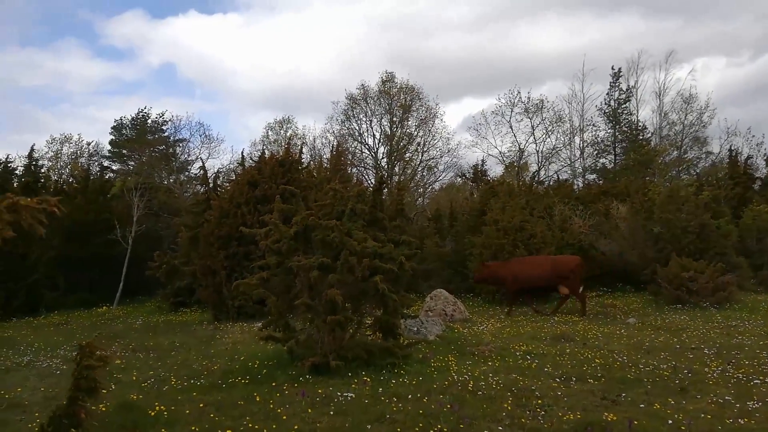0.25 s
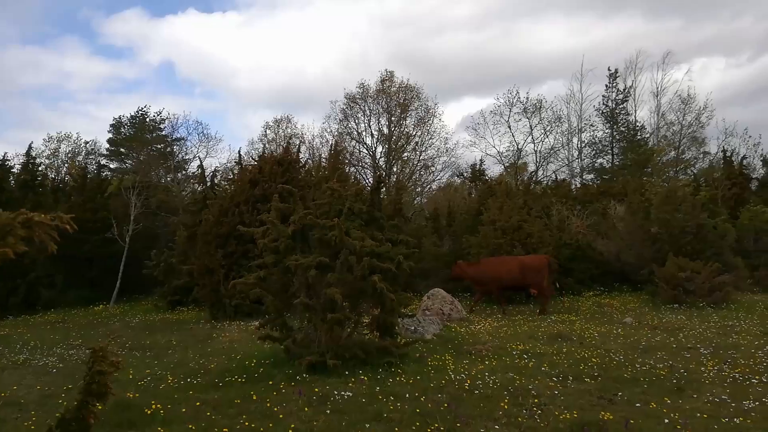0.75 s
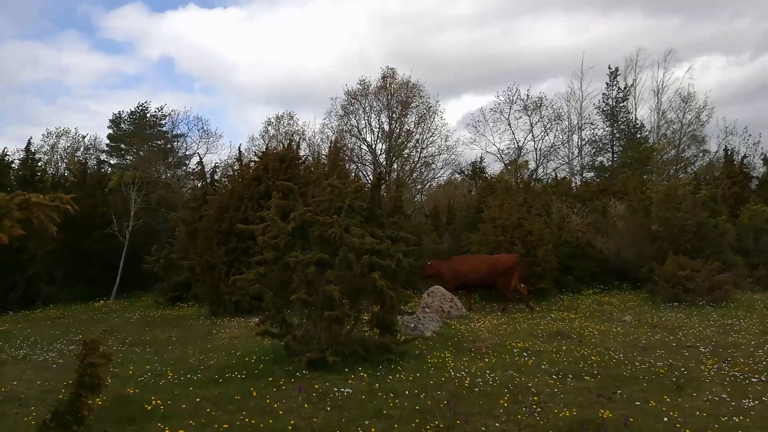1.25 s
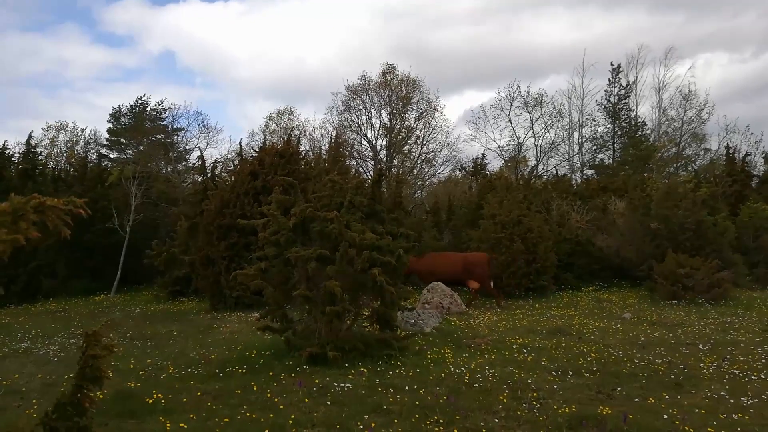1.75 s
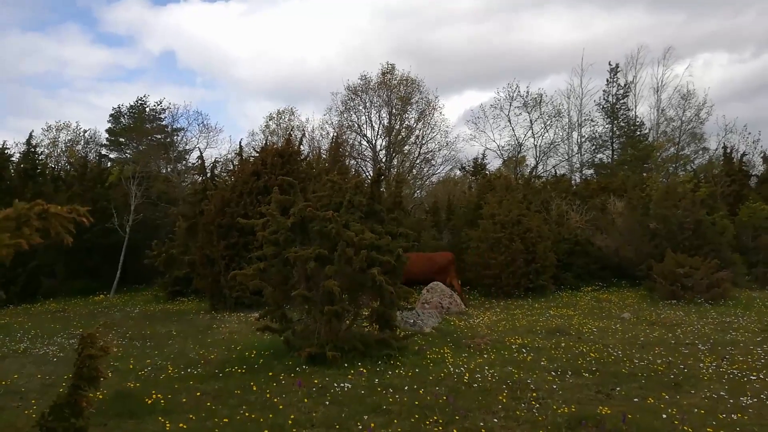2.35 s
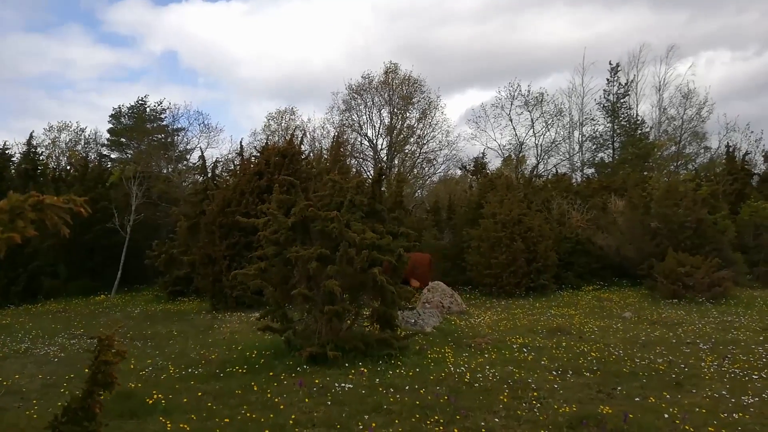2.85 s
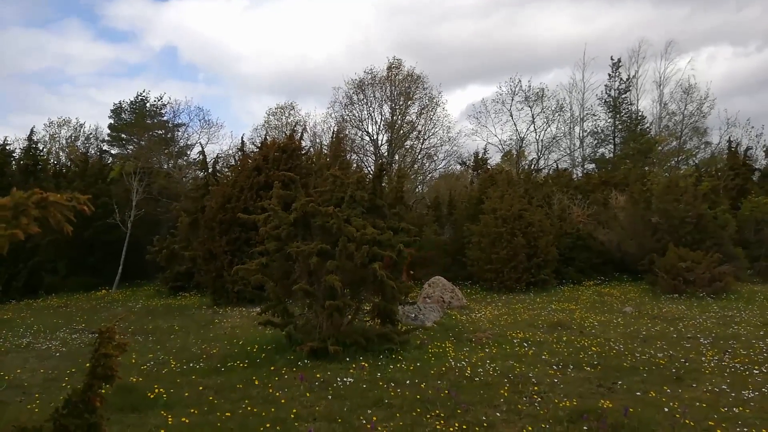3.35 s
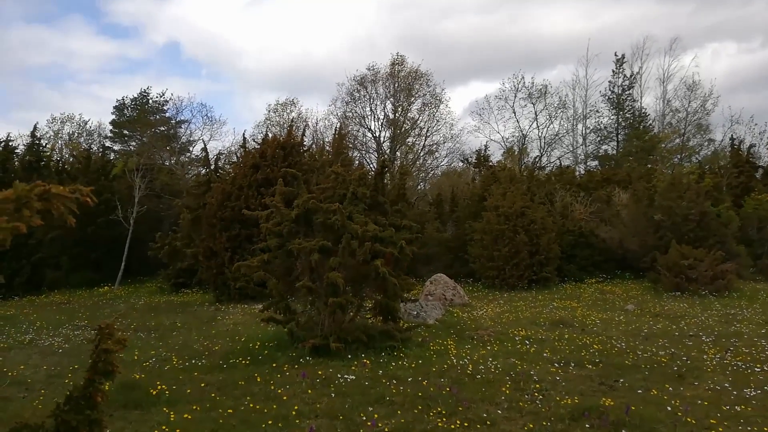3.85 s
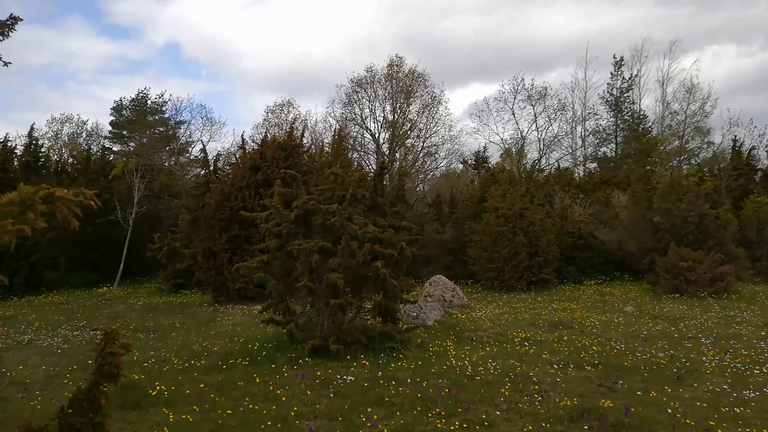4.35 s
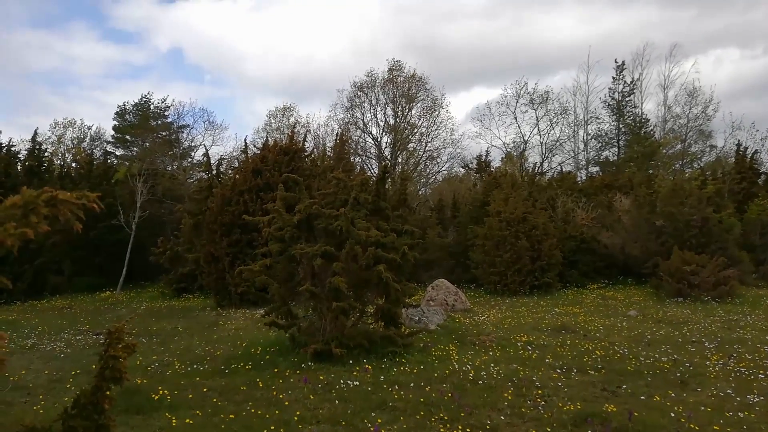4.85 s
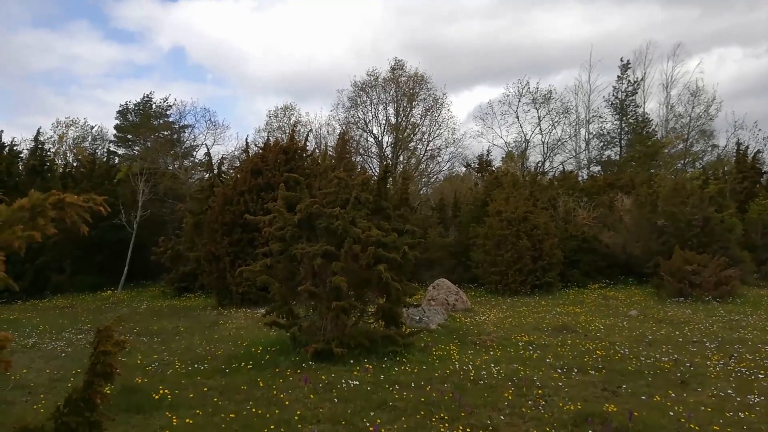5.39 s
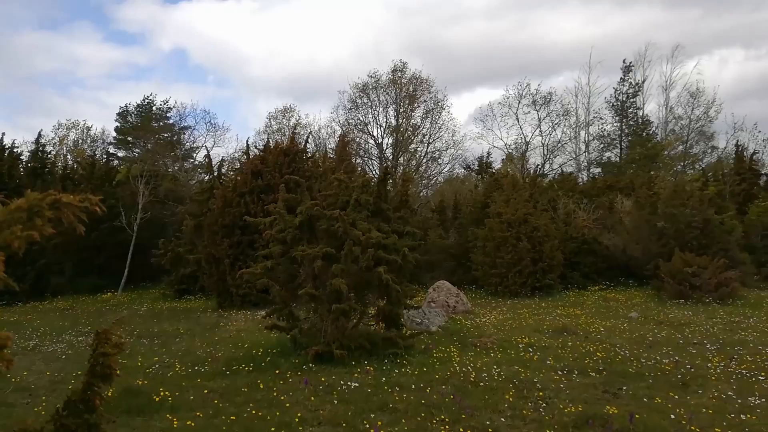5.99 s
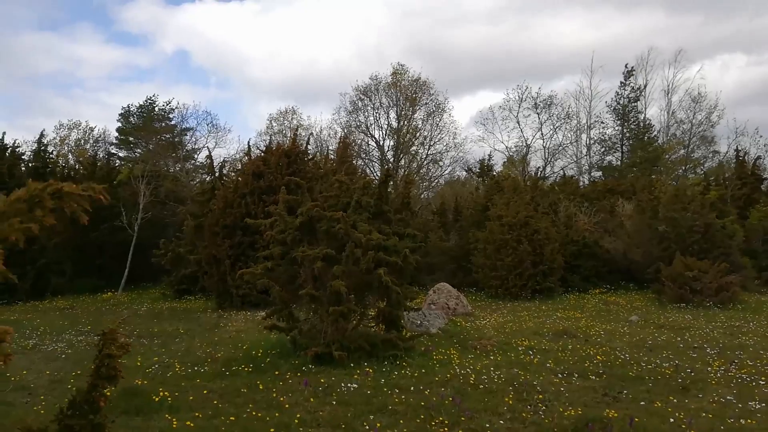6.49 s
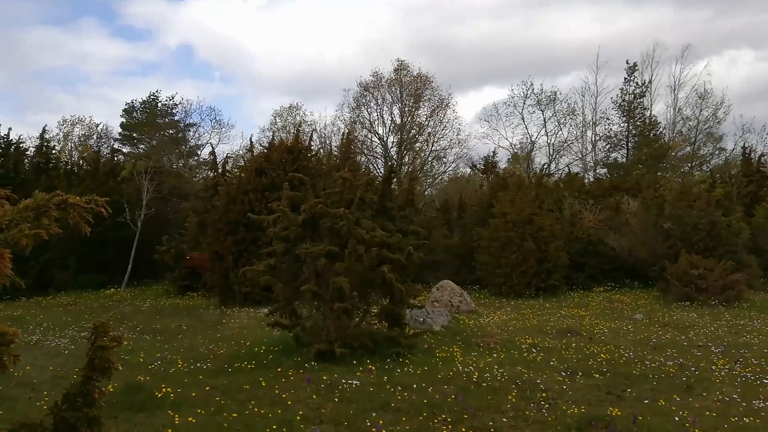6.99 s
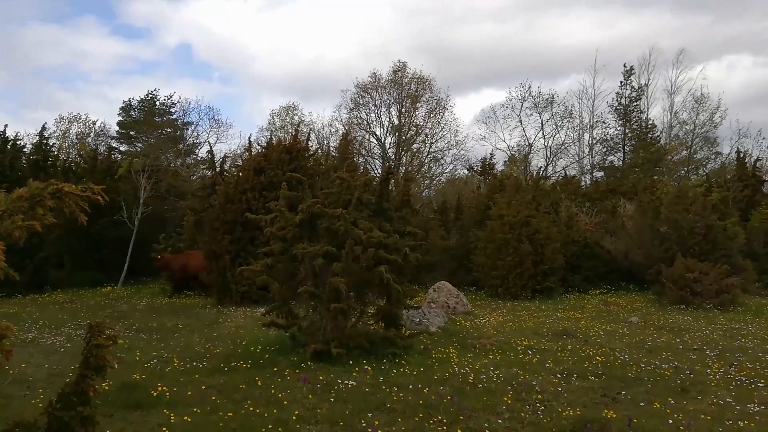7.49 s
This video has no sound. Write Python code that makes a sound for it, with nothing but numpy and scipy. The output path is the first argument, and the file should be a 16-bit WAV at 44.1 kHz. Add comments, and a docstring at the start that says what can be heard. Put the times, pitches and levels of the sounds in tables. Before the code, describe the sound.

In an open meadow edged with trees, a gust hits the microphone with low, rough thumps, then dies away. Faint birds chirp and trill over a soft hush of leaves, and a few tiny dry ticks sound close by. From about halfway, a nearer songbird repeats a two-note call of down-slurred whistles, growing louder. Lighter gusts rumble again, and another bird joins with a quick, raspy twitter near the end.

```python
"""Songbirds in a gusty meadow

Birds sing round a meadow edged with junipers; the trees scatter their notes back.
The nearest repeats a two-note call of down-slurred whistles; others slur, trill and twitter further off.
Gusts buffet the two microphone ports. Dry ticks and rustles sound close by over a soft foliage hush."""
import sys
import numpy as np
from scipy import signal
from scipy.fft import rfft, irfft
from scipy.io import wavfile
from scipy.ndimage import uniform_filter1d, map_coordinates

SR = 44100
rng = np.random.default_rng(int(sys.argv[2]) if len(sys.argv) > 2 else 0)


def store_wav(level_fs):
    """Save 16-bit WAV to argv[1]."""
    pcm = np.round(np.clip(np.atleast_2d(level_fs), -1, 1) * 32767)
    wavfile.write(sys.argv[1], SR, pcm.T.astype(np.int16))


N = 340893
TIME_S = np.arange(N) / SR
FREQ_HZ = np.fft.rfftfreq(N, 1 / SR)

# near bird, high and low note: offset_s, pitch_hz, relative_db
FLICK_SHAPE = [(0, 3450, -21), (.003, 3790, -4.5), (.006, 4580, -6.5), (.009, 3640, -5.5), (.014, 2954, -5),
               (.02, 2620, -7), (.027, 2480, -20), (.1, 2387, -17)]
SLUR_SHAPE = [(0, 2530, -18), (.007, 2434, -13), (.014, 2260, -3.5), (.025, 1972, -6), (.034, 1800, -16.5),
              (.041, 1780, -16)]
# its calls: flick_start_s, flick_gain_db, slur_start_s, slur_gain_db
CALLS = [(4.236, -52, 4.334, -45.5), (4.744, -46, 4.841, -35.5), (5.235, -41.5, 5.333, -34.5),
         (5.704, -39.5, 5.803, -35.5), (6.182, -37, 6.281, -34)]
# run of falling notes: start_s, start_hz, end_hz, level_db
RUN_NOTES = [(2.334, 4650, 3140, -50), (2.443, 4200, 2905, -49), (2.541, 4690, 2820, -52),
             (2.646, 4530, 2690, -48), (2.76, 4570, 2690, -51.5), (2.876, 4500, 2940, -48.5)]
# gliding notes, birds to the right: start_s, length_s, start_hz, end_hz, level_db
RIGHT_SLURS = [(0.016, 0.012, 3360, 1700, -48), (0.211, 0.019, 3420, 1710, -45),
               (.862, 0.021, 4940, 4370, -55.5), (1.214, 0.038, 3920, 3280, -60),
               (1.389, 0.031, 3390, 2780, -56.5), (1.959, 0.032, 3630, 3070, -56.5),
               (2.048, .06, 3070, 2790, -56.5), (2.113, .15, 2770, 2710, -66),
               (2.993, .039, 3950, 3470, -59), (3.405, 0.0147, 3200, 2550, -57.5),
               (6.101, .044, 4200, 3300, -57), (6.414, .046, 4150, 3280, -55),
               (7.283, .032, 4310, 3080, -58), (7.49, .14, 2940, 2857, -46)]
RIGHT_SCOOPS = [(.903, 0.05, 2830, 3360, -57.5), (6.517, 0.027, 3000, 4120, -59),
                (7.65, .065, 5820, 6800, -66)]
# arched notes, right and ahead: start_s, length_s, foot_hz, top_hz, level_db
RIGHT_ARCHES = [(2.06, 0.038, 4570, 4930, -64), (3.475, 0.059, 3250, 3850, -48),
                (4.375, 0.044, 4450, 4960, -64), (4.499, .028, 4390, 4760, -62),
                (7.659, 0.057, 2880, 3380, -59.5)]
FAR_ARCHES = [(7.603, 0.0282, 1750, 2097, -43)]
# trills, often two-voiced: start_s, length_s, start_hz, end_hz, level_db, depth_hz, rate_hz
RIGHT_TRILLS = [(0.922, 0.21, 3290, 3430, -53.5, 75, 84), (0.915, 0.21, 4100, 4120, -50, 130, 86.5),
                (0.917, .2, 4590, 4560, -59.5, 200, 89), (2.104, 0.3, 3294, 3370, -60.5, 70, 71.3),
                (2.39, 0.14, 3250, 3400, -58, 50, 68.5), (2.988, 0.32, 3320, 2995, -56.5, 120, 62.6),
                (3.01, 0.26, 4730, 4460, -54, 125, 62.6), (7.469, 0.058, 3270, 2930, -47.5, 217, 139)]
# twittering bird, upward hooks: start_s, top_hz, level_db
HOOKS = [(6.686, 5200, -48), (6.786, 5260, -42.5), (6.882, 4950, -41), (6.976, 4730, -46.5),
         (7.263, 4390, -40), (7.359, 4640, -46.5)]
# its rasps: start_s, length_s, pitch_hz, level_db
RASPS = [(6.606, 0.087, 4160, -53), (6.728, 0.075, 4340, -48.5), (6.897, 0.05, 4100, -47.5),
         (7.024, 0.078, 4100, -40.5), (7.153, .066, 4087, -37.5), (7.143, 0.05, 5070, -53.5),
         (7.387, 0.07, 4430, -52)]
# down-slurs ahead: start_s, length_s, start_hz, end_hz, level_db
FAR_SLURS = [(6.489, 0.043, 1806, 1470, -52), (6.553, .04, 1710, 1330, -59),
             (7.109, 0.039, 2000, 1365, -57), (7.179, 0.035, 1750, 1374, -54.5),
             (7.586, 0.0183, 2380, 1590, -50), (7.708, 0.0087, 2420, 1650, -48)]
# thin far pips: start_s, period_s, length_s, start_hz, end_hz, level_db, stop_s
PIP_SERIES = [(1.403, .079, 0.024, 6130, 5570, -67, 1.9), (6.127, .139, 0.05, 5720, 5420, -67, 6.6)]
# high two-voiced phrase, far off: start_s, level_db
PHRASES = [(6.828, -52.5), (7.352, -51)]
# its notes: offset_s, length_s, start_hz, middle_hz, end_hz, relative_db, depth_hz, rate_hz
PHRASE_NOTES = [(0, 0.046, 7220, 7420, 6500, -8, 4, 2), (.003, 0.033, 5150, 5560, 5700, -4, 0, 0),
                (0.03, .046, 7020, 6750, 7100, 1, 220, 111)]
# opening squall: time_s, level_db
SQUALL = [(0.0, -19.5), (0.026, -23.5), (0.25, -23.5), (0.264, -29.5), (0.362, -20), (0.41, -27),
          (0.506, -18.5), (0.546, -25.5), (0.716, -30.5), (0.768, -46), (0.824, -40), (0.914, -58),
          (1.106, -45), (1.22, -60)]
# later gusts: start_s, length_s, level_db
GUSTS = [(1.543, 0.029, -48), (1.751, 0.053, -48), (2.842, 0.03, -50.5), (2.97, 0.18, -53.5),
         (4.182, .12, -39), (4.501, 0.05, -45), (4.639, 0.031, -36), (4.875, 0.027, -45.5),
         (5.013, 0.042, -43), (5.159, 0.022, -44.5), (5.208, 0.042, -34.5), (5.31, 0.1, -41.5),
         (5.441, 0.015, -32.5), (5.509, 0.17, -39.5), (5.761, 0.14, -40.5), (6.078, 0.066, -41.5),
         (6.192, .1, -39), (6.5, 0.018, -43.5), (6.664, 0.14, -32.5), (6.831, .15, -34.5),
         (7.236, 0.019, -46), (7.316, 0.22, -46), (7.429, 0.019, -37)]
# single eddies at the ports: centre_s, level_db, freq_hz
EDDIES = [(.004, -8, 174), (.045, -9, 357), (.067, -10, 417), (.113, -10.5, 157), (.238, -11.5, 139),
          (.317, -13.5, 120), (0.356, -5, 170), (.358, -7.5, 450), (.378, -9.5, 260), (0.3807, -6.5, 620),
          (.44, -12.5, 220), (.5, -9.5, 205), (4.661, -27, 115), (5.214, -26, 139), (5.379, -28, 84),
          (5.446, -26, 115), (6.207, -23.5, 180), (6.78, -22.5, 141), (6.966, -25, 101)]
# dry ticks: start_s, level_db, centre_hz, left_minus_right_db
TICKS = [(.927, -39.5, 9170, 0), (1.3922, -34, 5860, -3), (1.7457, -39, 9580, 4), (1.775, -29.5, 9450, 0),
         (1.8917, -35.5, 8830, 2), (1.936, -33, 9500, 5), (1.9958, -28, 10000, 13),
         (2.0274, -29.5, 9700, 7), (2.0389, -24.5, 8780, -2), (2.1373, -37.5, 6800, 9),
         (2.1695, -43, 6200, 0), (2.1974, -39, 9490, 2), (2.2511, -42, 9750, 5), (2.734, -42, 9500, -5),
         (2.9397, -42.5, 9750, 2), (3.1054, -45, 9650, -1), (4.9156, -43, 10200, 7), (5.022, -45, 9680, 10)]
# tick and rustle spectrum: freq_hz, gain_db
SNAP_SPECTRUM = [(800, -32), (2500, -2.5), (4200, -9.5), (5600, -2), (7200, -7.5), (9000, 3), (11000, -9.5),
                 (15000, -23.5)]
# soft rustles: centre_s, half_length_s, level_db
RUSTLES = [(0.205, 0.019, -56), (.44, 0.051, -67.5), (0.886, 0.078, -61), (1.48, 0.011, -57.5),
           (1.801, 0.031, -58), (1.88, 0.018, -66), (2.044, 0.0065, -45.5), (2.202, 0.0062, -47),
           (2.938, .008, -60), (7.04, .025, -67), (7.168, .025, -66)]
# hush spectrum: freq_hz, gain_db
HUSH_SPECTRUM = [(120, -21), (200, -5.5), (315, -3), (497, -12), (690, -11), (742, -8), (874, -8),
                 (940, -8.5), (1380, -11.5), (1910, -12), (3550, -18), (4410, -18.5), (6240, -23.5),
                 (9310, -21), (15500, -35)]
# hush level, ducked as by a recorder's gain control in the opening squall, then slowly drifting;
# each band used relative to its median: time_s, leaves_db, hiss_db
HUSH_LEVELS = [(0, -65.5, -72), (.52, -70, -73), (.92, -65.5, -66.5), (1.57, -67.5, -70), (2, -65.5, -68.5),
               (3.66, -67, -71), (6.87, -69, -71.5), (7.73, -69, -72)]


def near_bird():
    """A quick high flick, then a lower slur; the call grows as it repeats."""
    flicks, slurs = np.zeros((2, N))
    for flick_s, flick_db, slur_s, slur_db in CALLS:
        add(flicks, flick_s, gain(flick_db) * near_note(FLICK_SHAPE))
        add(slurs, slur_s, gain(slur_db) * near_note(SLUR_SHAPE))
    direct = ports(flicks, left_db=-3, lead_ms=-0.076) + ports(slurs, left_db=7.5, lead_ms=0)
    return direct + trees(gain(-1) * flicks + gain(-5) * slurs, t60_s=0.48, build_s=0.0012)


def near_note(shape):
    """One whistle along a pitch and level contour."""
    offset_s, pitch_hz, level_db = np.transpose(shape)
    t = np.arange(0, offset_s[-1], 1 / SR)
    envelope = gain(np.interp(t, offset_s, level_db)) * signal.windows.tukey(len(t), 0.05)
    return whistle(np.interp(t, offset_s, pitch_hz), envelope, flutter_db=-0.7)


def whistle(pitch_hz, envelope, flutter_db):
    """A near-pure tone; moving air flutters its strength."""
    flutter = gain(flutter_db * waver(len(pitch_hz), 120))
    return envelope * flutter * np.sin(2 * np.pi * np.cumsum(pitch_hz) / SR)


def run_bird(note_s=0.043):
    """Slightly hoarse falling notes, smeared by the bush that hides the singer."""
    notes = [slur(start_s, note_s, start_hz, end_hz, level_db, depth_hz=45, bend=0.58)
             for start_s, start_hz, end_hz, level_db in RUN_NOTES]
    run = song(notes, rough=1, fade=0.4)
    direct = ports(gain(-0.5) * run, left_db=-1, lead_ms=-0.042)
    bush = gain(-3) * trees(run, t60_s=0.083, build_s=0.0029, treble_t60_s=0.17)
    wood = gain(-9) * trees(run, t60_s=0.76, build_s=0.01)
    return direct + bush * pan(-3) + wood


def other_birds():
    """Three groups of singers; bushes blur two, the wood adds a tail to all."""
    right = song(right_notes(), rough=0.5, fade=0.3)
    twitter = song(twitter_notes(), rough=0.68, fade=0.43)
    far = song(far_notes(), rough=0.34, fade=0.41)
    direct = ports(right, left_db=-1.5, lead_ms=-0.057)
    direct += ports(gain(-1.5) * twitter, left_db=-7, lead_ms=-0.052)
    direct += ports(far, left_db=0, lead_ms=-0.041)
    to_bush = gain(-5) * right + gain(-3.5) * twitter
    to_wood = gain(-11.5) * right + gain(-11) * twitter + gain(-3.5) * far
    bush = trees(to_bush, t60_s=0.09, build_s=0.003, treble_t60_s=0.08)
    wood = trees(to_wood, t60_s=0.61, build_s=0.012, treble_t60_s=0.43)
    return direct + bush * pan(-4) + wood


def right_notes():
    """Scattered slurs, arches, scoops and trills."""
    notes = [slur(*row, bend=0.58) for row in RIGHT_SLURS] + [arch(*row) for row in RIGHT_ARCHES]
    return notes + [slur(*row) for row in RIGHT_SCOOPS + RIGHT_TRILLS]


def twitter_notes(sag=0.0308, foot_hz=3676, dip_hz=3480, lead_s=0.0263, rise_s=0.021, drop_s=0.0128):
    """Rasps alternate with hooks: a soft lead-in, a whip upward, a drop back."""
    notes = [slur(start_s, length_s, hz * (1 + sag), hz * (1 - sag), level_db, depth_hz=326, rate_hz=99)
             for start_s, length_s, hz, level_db in RASPS]
    for start_s, top_hz, level_db in HOOKS:
        notes += [arch(start_s - lead_s, lead_s, foot_hz, dip_hz, level_db - 17.5),
                  slur(start_s, rise_s, foot_hz, top_hz, level_db, bend=0.34),
                  slur(start_s + rise_s, drop_s, top_hz, foot_hz, level_db - 15)]
    return notes


def far_notes():
    """Low slurs and an arch, evenly spaced pips, a repeated high phrase."""
    notes = [slur(*row, bend=0.58) for row in FAR_SLURS] + [arch(*row) for row in FAR_ARCHES]
    for first_s, period_s, length_s, start_hz, end_hz, level_db, stop_s in PIP_SERIES:
        for start_s in np.arange(first_s, stop_s, period_s):
            detune = 1 + 0.0122 * rng.standard_normal()
            pip_db = level_db + 2.5 * rng.standard_normal()
            notes.append(slur(start_s, length_s, detune * start_hz, detune * end_hz, pip_db, bend=0.66))
    for start_s, level_db in PHRASES:
        for offset_s, *shape, relative_db, depth_hz, rate_hz in PHRASE_NOTES:
            notes.append((start_s + offset_s, *shape, level_db + relative_db, depth_hz, rate_hz))
    return notes


def slur(start_s, length_s, start_hz, end_hz, level_db, depth_hz=0, rate_hz=0, bend=0.5):
    """A one-way glide; bend is the share covered at half time."""
    middle_hz = start_hz + bend * (end_hz - start_hz)
    return start_s, length_s, start_hz, middle_hz, end_hz, level_db, depth_hz, rate_hz


def arch(start_s, length_s, foot_hz, middle_hz, level_db):
    """A note that returns to its first pitch."""
    return start_s, length_s, foot_hz, middle_hz, foot_hz, level_db, 0, 0


def song(notes, rough, fade):
    """Notes bend through three pitches; fast, uneven vibrato makes trills and rasps."""
    out = np.zeros(N)
    for start_s, length_s, start_hz, middle_hz, end_hz, level_db, depth_hz, rate_hz in notes:
        count = max(int(length_s * SR), 64)
        progress = np.linspace(0, 1, count)
        glide_hz = np.polyval(np.polyfit([0, 0.5, 1], [start_hz, middle_hz, end_hz], 2), progress)
        vibrato_rad = 2 * np.pi * np.cumsum(rate_hz * (1 + 0.3 * rough * waver(count, 120))) / SR
        pitch_hz = glide_hz + depth_hz * (np.sin(vibrato_rad) + rough * waver(count, 1200))
        pulse = 1 - 0.58 * np.sin(vibrato_rad / 2) ** 2  # one dip per cycle
        if rate_hz:
            swell = 1.15 * np.sin(np.pi * progress ** 0.85).clip(0)
        else:
            swell = signal.windows.tukey(count, fade)
        add(out, start_s, whistle(pitch_hz, gain(level_db) * pulse * swell, flutter_db=2.5))
    return out


def trees(sound, t60_s, build_s, treble_t60_s=0.28, echoes_per_s=2500):
    """Trunks and foliage return faint echoes, different at each port; treble has its own decay."""
    t = np.arange(SR) / SR
    echoes = impulses(SR, echoes_per_s) * (1 - np.exp(-t / build_s))
    low = signal.sosfiltfilt(signal.butter(2, 3200, fs=SR, output="sos"), echoes)
    response = low * gain(-60 * t / t60_s) + (echoes - low) * gain(-60 * t / treble_t60_s)
    response /= np.linalg.norm(response, axis=1, keepdims=True)
    return signal.fftconvolve(sound[None], response, axes=1)[:, :N]


def wind():
    """Turbulence crosses the left port, then the right; hard pushes break into rough flutter."""
    flow, swirl = turbulence()
    blows = eddies()
    force = uniform_filter1d(blows ** 2 + 0.32 * flow ** 2, size=450) / gain(-14) ** 2
    flutter_db = curve([(200, -19), (500, 9), (850, -7.5), (1400, -23), (2300, -41), (5000, -84)])
    flutter = gain(-25) * np.tanh(0.89 * force) * noise(gain(flutter_db))
    left, right = ports(flow + blows + flutter, left_db=0, lead_ms=0.75)
    # downwind port is duller
    shelter_db = curve([(60, 1.5), (130, -1.5), (260, -1.5), (520, -3), (1200, -16.5)])
    return np.array([left + swirl, filtered(right - swirl, gain(shelter_db))])


def turbulence(db_per_octave=29):
    """Half-octave noise bands; stronger gusts carry smaller, higher eddies."""
    level_db = gust_level_db() + 1.5 * waver(N, 28)
    corner_hz = 140 * 2 ** (np.maximum(level_db + 36, -6) / db_per_octave)
    flow, swirl, power = np.zeros((3, N))
    for band_hz in 25 * 2 ** (np.arange(13) / 2):
        high_cut = 1 + (band_hz / corner_hz) ** 7.76
        low_cut = 1 + (0.34 * corner_hz / band_hz) ** 3
        share = band_hz ** 0.11 / np.sqrt(high_cut * low_cut)
        band = np.exp(-(np.log2((FREQ_HZ + 1) / band_hz) / 0.37) ** 2)
        flow += share * noise(band)
        swirl += share * noise(band) * 0.12 * np.sqrt(band_hz / 100)  # small eddies differ between ports
        power += share ** 2
    running_rms = np.sqrt(uniform_filter1d(flow ** 2, size=1500) + 0.039 * power)
    return np.array([flow, swirl]) / running_rms * gain(level_db + 0.38)


def gust_level_db(lull_db=-58, rise_db_per_s=1100, fall_db_per_s=750):
    """The squall dies to a lull; later gusts jump up, hold and fall away."""
    time_s, squall_db = np.transpose(SQUALL)
    level_db = np.interp(TIME_S, time_s, squall_db - 0.5, right=lull_db).clip(lull_db)
    for start_s, length_s, top_db in GUSTS:
        age_s = TIME_S - start_s
        below_db = np.maximum(-rise_db_per_s * age_s, fall_db_per_s * (age_s - length_s)).clip(0)
        level_db = np.maximum(level_db, top_db - below_db)
    return level_db


def eddies():
    """Each passing eddy sucks, then pushes."""
    out = np.zeros(N)
    t = np.arange(-0.02, 0.02, 1 / SR)
    for centre_s, level_db, freq_hz in EDDIES:
        phase = 2 * np.pi * freq_hz * t
        envelope = np.exp(1.25 - np.sqrt(1 + (1.125 * phase) ** 2) - (phase / 3.6) ** 2)
        add(out, centre_s + t[0], gain(level_db) * phase * envelope)
    return out


def ticks(attack_s=0.0002, snap_t60_s=0.0063, crumble_t60_s=0.04):
    """Tiny dry snaps: a brief coloured burst, then a faint crumble."""
    out = np.zeros((2, N))
    t = np.arange(2048) / SR
    freq_hz = np.fft.rfftfreq(len(t), 1 / SR)
    decay = gain(-60 * t / snap_t60_s) + gain(-27 - 60 * t / crumble_t60_s)
    envelope = decay * (1 - np.exp(-t / attack_s))
    for start_s, level_db, centre_hz, left_db in TICKS:
        colour_db = curve(SNAP_SPECTRUM, freq_hz) - 2 * np.log2((freq_hz + 1) / centre_hz) ** 2
        burst = unit_rms(filtered(rng.standard_normal((2, len(t))), gain(colour_db)))
        add(out, start_s, burst * envelope * gain(level_db + 0.5) * pan(left_db))
    return out


def rustles(snaps_per_s=1800):
    """Clumps of very small snaps, coloured like the ticks."""
    swell = sum(gain(level_db) * np.exp(-((TIME_S - centre_s) / half_length_s) ** 2)
                for centre_s, half_length_s, level_db in RUSTLES)
    snaps = filtered(impulses(N, snaps_per_s), gain(curve(SNAP_SPECTRUM)))
    return swell * unit_rms(snaps) * pan(3)


def hush(level_db=-59, split_hz=3500):
    """Far foliage and thin hiss, unrelated at the two ports; the level dips early, then drifts."""
    time_s, leaves_db, hiss_db = np.transpose(HUSH_LEVELS)
    leaves_gain, hiss_gain = (gain(np.interp(TIME_S, time_s, db - np.median(db)).clip(-5, 4))
                              for db in (leaves_db, hiss_db))
    bed = np.array([noise(gain(curve(HUSH_SPECTRUM))) for side in range(2)])
    left_db = curve([(380, -1), (700, 2), (1300, -0.5), (4400, -2.5), (8100, 2.5), (15000, 1)])
    bed = filtered(bed, pan(left_db))
    hiss = filtered(bed, 1 / (1 + (split_hz / (FREQ_HZ + 1)) ** 4))
    return gain(level_db) * (leaves_gain * (bed - hiss) + hiss_gain * hiss)


def ports(sound, left_db, lead_ms):
    """One source at two ports; the left is louder by left_db, earlier by lead_ms."""
    delayed = filtered(sound, np.exp(-2j * np.pi * FREQ_HZ * lead_ms / 1000))
    return np.array([sound, delayed]) * pan(left_db)


def pan(left_db):
    """Left and right gains, left_db apart."""
    return gain(np.vstack([left_db, -left_db]) / 2)


def gain(db):
    """Decibels to amplitude."""
    return 10 ** (np.asarray(db) / 20)


def unit_rms(sound):
    """Scales to rms 1."""
    return sound / np.sqrt(np.mean(sound ** 2) + 1e-20)


def curve(points, freq_hz=FREQ_HZ):
    """Interpolates dB over log frequency."""
    point_hz, point_db = np.transpose(points)
    return np.interp(np.log(freq_hz + 1), np.log(point_hz + 1), point_db)


def filtered(sound, gains):
    """Applies one gain per frequency bin."""
    return irfft(rfft(sound) * gains, sound.shape[-1])


def noise(gains):
    """Shaped noise, rms 1."""
    return unit_rms(filtered(rng.standard_normal(N), gains))


def impulses(count, rate_per_s):
    """Sparse random stereo impulses."""
    return rng.standard_normal((2, count)) * (rng.random((2, count)) < rate_per_s / SR)


def waver(count, rate_hz):
    """Smooth random drift of size about 1."""
    position = np.arange(count) * rate_hz / SR
    return map_coordinates(rng.standard_normal(256), [position], order=3, mode="grid-wrap")


def add(mix, start_s, sound):
    """Mixes a sound in at start_s."""
    part = mix[..., max(round(start_s * SR), 0):][..., :sound.shape[-1]]
    part += sound[..., :part.shape[-1]]


def scene():
    """Birds, wind, ticks and rustles over the hush."""
    return near_bird() + run_bird() + other_birds() + wind() + ticks() + rustles() + hush()


def record(dry, cutoff_hz=15500):
    """The recorder's band limit."""
    lowpass = signal.firwin(511, cutoff_hz, window=("kaiser", 9), fs=SR)
    return signal.oaconvolve(dry, lowpass[None], "same")


dry = scene()
out = record(dry)
store_wav(out)
```